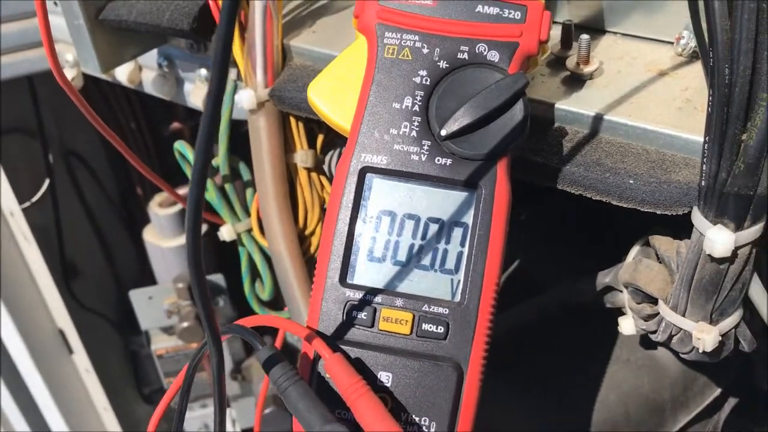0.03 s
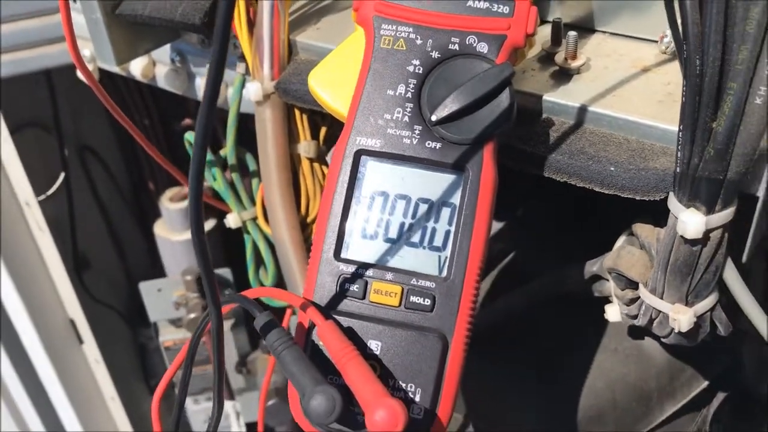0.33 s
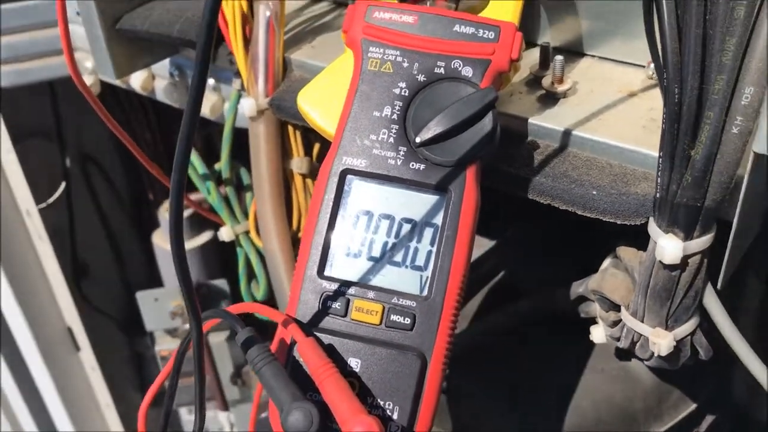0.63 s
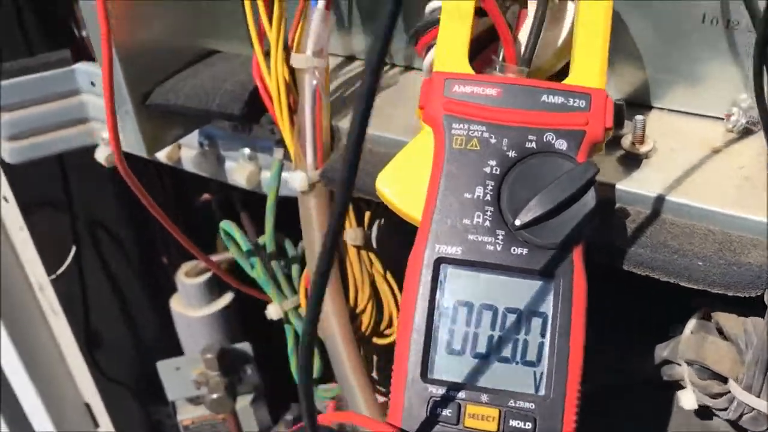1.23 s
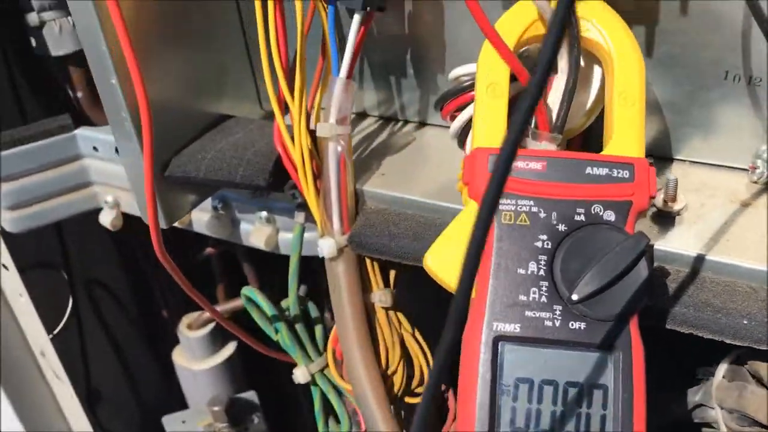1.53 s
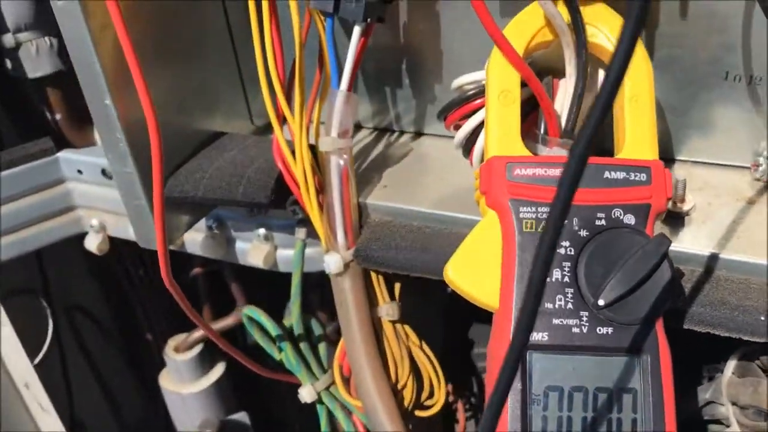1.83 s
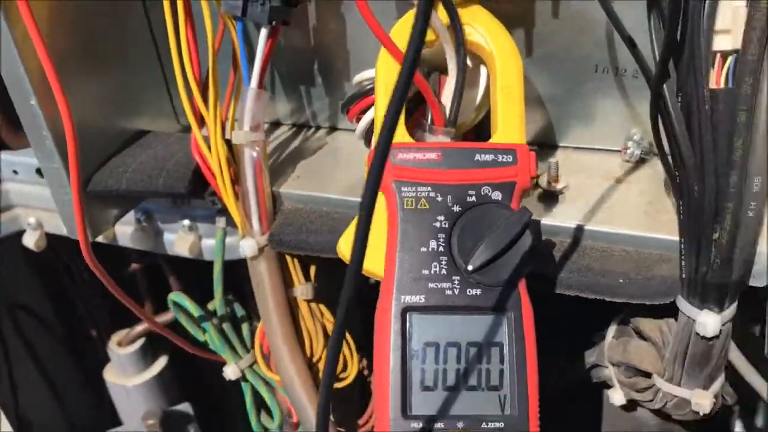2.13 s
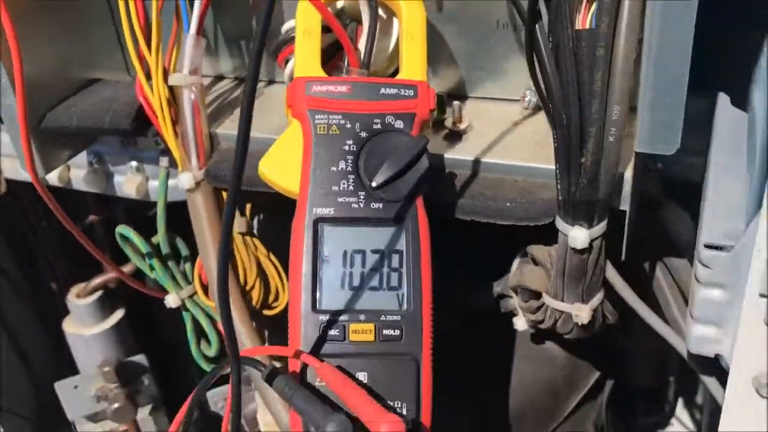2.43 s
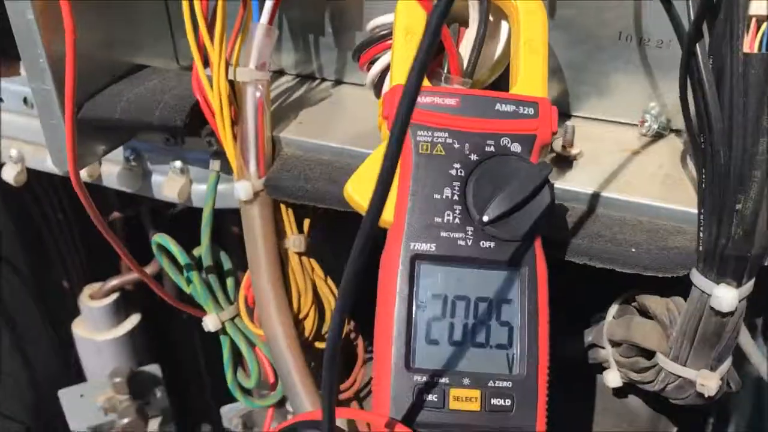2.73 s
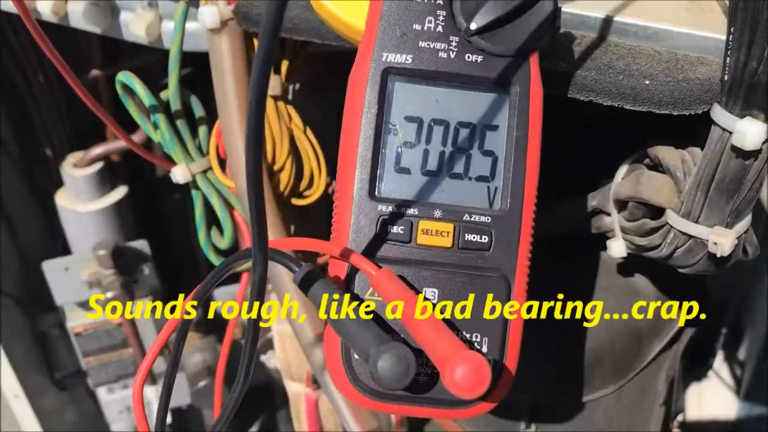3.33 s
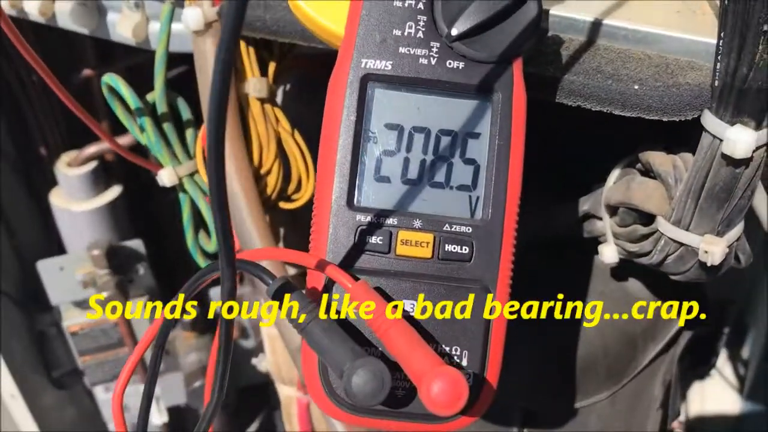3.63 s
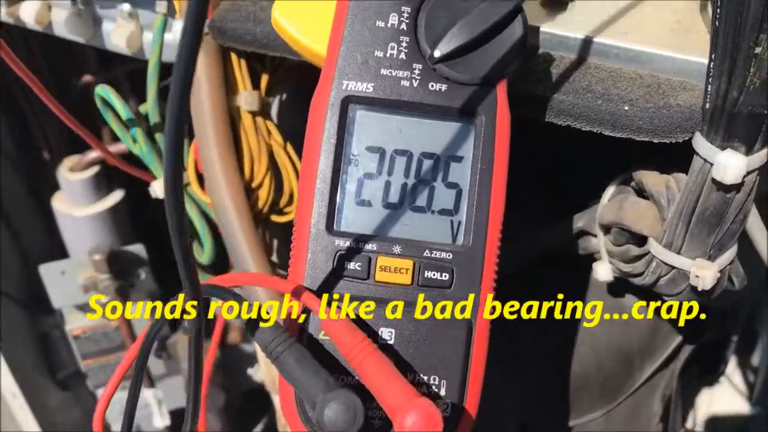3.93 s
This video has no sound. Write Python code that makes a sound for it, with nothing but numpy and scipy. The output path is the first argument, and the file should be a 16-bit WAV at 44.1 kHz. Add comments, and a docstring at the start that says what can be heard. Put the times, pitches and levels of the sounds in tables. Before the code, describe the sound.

An air conditioner compressor starts up roughly, close to the microphone outdoors. First a fan rumbles with a thin whine while test leads scrape and tick; then a relay clacks, and the compressor groans into a humming, squealing rattle.

```python
"""A fan rumbles and something electrical whines thinly: an outdoor air conditioner, panel off, close to
one microphone. Test leads scrape and tick. The contactor clacks shut and shakes the sheet-metal
cabinet, then the compressor starts with a groan and runs: a hum on the shaft's orders, a rough rattle
of knocks in every turn, a squealing shell and a pulsing hiss of gas."""
import sys
import numpy as np
from scipy import signal
from scipy.fft import rfft, irfft, next_fast_len
from scipy.io import wavfile
from scipy.ndimage import uniform_filter1d, map_coordinates

SR = 44100
rng = np.random.default_rng(int(sys.argv[2]) if len(sys.argv) > 2 else 0)


def bounce(signal):
    """Save signal as a 16-bit WAV file at the path given by the first command-line argument."""
    frames = np.transpose(np.atleast_2d(signal))
    limited = np.clip(frames, -1, 1)
    pcm = np.round(limited * 32767).astype(np.int16)
    wavfile.write(sys.argv[1], SR, pcm)


N = 176400

# fan rumble spectrum: freq_hz, gain_db
RUMBLE_COLOUR = [(30, -22), (48, -6), (62, -6.5), (115, -2), (150, 6), (190, -6.5), (260, -7), (390, -5.5),
                 (480, -17.5), (800, -29), (2000, -48)]
# rushing air spectrum: freq_hz, gain_db
RUSH_COLOUR = [(300, -32), (600, 3), (820, 0.5), (1300, 1), (2200, -7.5), (4300, -18), (6000, -18),
               (10400, -29), (11900, -19), (13300, -36), (15500, -27)]
# rushing air over time: time_s, gain_db
RUSH_LEVEL = [(0, -56), (.6, -56.5), (1.0, -55.5), (1.45, -56), (1.85, -55.5), (2.15, -55)]
# low fan tones: pitch_hz, gain_db, flutter_db, wander_rad
FAN_TONES = [(76.6, -36.5, 0, 0.21), (101.1, -63, -10.5, 2.7), (155.1, -43, 1, 1.35), (205.8, -45, 0, 0.52),
             (233, -46, -2.5, 0.65)]
# electrical tones: pitch_hz, gain_db
WHINE_TONES = [(11666, -15), (11739, -3), (11844, -8), (11948, 0), (12035, -15)]
# whine over time: time_s, level_db
WHINE_LEVEL = [(0, -57), (.5, -53.5), (1.0, -51.5), (1.62, -60), (1.75, -55.5), (2.22, -60), (2.47, -53.5),
               (2.8, -54)]
# scrapes of the leads: peak_s, level_db, rise_s (per 20 dB), t60_s
SCRAPES = [(1.128, -33.5, 0.017, 0.097), (1.190, -46.5, 0.0046, 0.063), (1.207, -50, 0.0044, 0.025),
           (1.268, -49.5, 0.088, 0.18)]
# scrape and click spectrum: freq_hz, gain_db
SCRAPE_COLOUR = [(500, 0), (1800, -9.5), (2500, -1), (3800, 0), (4800, -4.5), (6000, -2.5), (10000, -15.5),
                 (15000, -14)]
# touches of a probe tip: start_s, gain_db
PROBE_TICKS = [(1.4715, -50), (1.567, -31.5)]
# the tip's ring: pitch_hz, gain_db, t60_s
PROBE_MODES = [(1030, -1, 0.025), (2930, 2, 0.02), (3230, -2, .016), (3720, -4.5, 0.031),
               (6000, -13, 0.018)]
# coil pulls, contacts touch, armature lands and rebounds: start_s, level_db, t60_s
CLACKS = [(2.1602, -28, 0.026), (2.1683, -27, 0.014), (2.1718, -12.5, 0.024), (2.174, -14.5, 0.028),
          (2.1782, -19, 0.038)]
# clack spectrum: freq_hz, gain_db
CLACK_COLOUR = [(410, -7), (700, -10), (1100, -6), (1270, 1), (1450, -11.5), (2310, -4), (2530, -17),
                (2990, -6), (3680, -17), (3970, -2), (4350, -10), (5290, -14), (6420, 0.5), (7400, -18),
                (8210, -4.5), (9110, -14), (15500, -12.5)]
# the cabinet's ring: pitch_hz, level_db, t60_s
CABINET_MODES = [(132, -38, 0.2), (198, -23, 0.22), (317, -22, 0.18), (352, -23, 0.17), (606, -20.5, 0.19),
                 (590, -18.5, 0.077), (780, -27.5, 0.073), (930, -23, 0.01), (1292, -29.5, 0.14)]
# shaken sheet metal spectrum: freq_hz, gain_db
PANEL_COLOUR = [(200, 11), (600, 5), (1200, -4), (2400, 1.5), (4000, -6), (15000, -23)]
# start-up groan over time: time_s, level_db
GROAN_LEVEL = [(2.2, -58), (2.3, -43), (2.41, -41), (2.52, -44), (2.62, -42), (2.8, -54), (4, -56)]
# groan spectrum: freq_hz, gain_db
GROAN_COLOUR = [(200, -25), (400, -12.5), (520, 12.5), (600, 0), (750, -5), (2000, -45)]
# bearing squeaks at start-up: start_s, length_s, pitch_hz, level_db
SQUEAKS = [(2.25, 0.054, 7300, -50.5), (2.303, 0.03, 5900, -44.5)]
# compressor shaft speed: time_s, speed_hz
SHAFT_SPEED = [(3.24, 59.7), (3.382, 59.1), (3.424, 59.5), (3.644, 59.7)]
# running compressor: time_s, treble_gain_db (rattle and hiss), loud_order_gain_db
RUNNING_LEVELS = [(2.23, -52.5, -50.5), (2.48, -41, -35), (2.506, -43.5, -43), (2.756, -40.5, -36.5),
                  (2.92, -40, -49.5), (3.102, -39.5, -41), (3.372, -41, -38.5), (3.446, -41, -49.5),
                  (3.51, -41.5, -43), (3.974, -39.5, -40), (4.0, -41, -44)]
# hum on multiples of the shaft speed: order, level_db
HUM_ORDERS = [(1, -49), (3, -43.5), (4, -47.5), (5, -48.5), (6, -51.5), (7, -58), (9, -51), (10, -61.5),
              (12, -54), (13, -58), (16, -63), (21, -62), (24, -60)]
# tone near 900 Hz over time: time_s, level_db
WHISTLE_LEVEL = [(2.8, -78), (2.92, -52.5), (3.55, -52), (3.62, -73), (3.78, -49), (4, -61)]
# compressor shell resonances: centre_hz, half_width_hz, gain_db
SHELL_MODES = [(2062, 63, 2.5), (2379, 8, -0.5), (2480, 55, 1), (2860, 19, 0), (3850, 52, 1)]
# shell over time: time_s, then one gain_db for each resonance
SHELL_LEVELS = [(2.3, -63, -65, -58, -75, -69), (2.374, -87, -57, -57, -76, -50.5),
                (2.49, -60, -43, -55, -54.5, -65), (2.772, -51.5, -39.5, -46.5, -53, -53),
                (3.028, -49, -46.5, -46.5, -54, -56), (3.153, -52, -54, -55, -47, -70),
                (3.26, -52, -45.5, -57, -52, -45), (3.34, -59, -45, -49.5, -58, -56),
                (3.588, -59, -55, -57, -46.5, -55), (3.777, -50, -50.5, -55.5, -56, -56),
                (4.0, -57, -40.5, -56, -51, -56)]
# rattle spectrum: freq_hz, gain_db
RATTLE_COLOUR = [(300, -14), (750, 0), (1300, -5.5), (1700, -8), (2400, 3.5), (2650, -5.5), (3400, 1),
                 (3780, -0.5), (4300, -1), (4550, 1.5), (4850, -5.5), (5150, -0.5), (5400, -4.5),
                 (5850, 3.5), (7400, -10), (8400, -5.5), (10300, -9.5), (11700, -6.5), (12500, -14),
                 (14600, -1), (15600, -9.5)]
# gas hiss and rasp spectrum: freq_hz, gain_db
HISS_COLOUR = [(300, -21), (550, -3), (800, -1.5), (1400, -0.5), (1750, -5), (2400, 4), (3200, 3),
               (4900, 0.5), (5800, 2), (7400, -2), (8500, 2), (10300, -15), (11700, -3), (14600, -7),
               (15700, -30.5)]

THUMP_S, START_S, CATCH_S = 2.1785, 2.19, 2.385  # cabinet is struck, motor starts, pump takes its load
LOUD_ORDER, WHISTLE_ORDER = 8, 15
HUM_RISE_S = 0.4
LOW_CUT_HZ, TOP_HZ = 35, 15850


def amp(db):
    """Decibels to gain."""
    return 10 ** (np.asarray(db) / 20)


def unit(x):
    """Scale to rms 1."""
    return x / np.sqrt(np.mean(x ** 2) + 1e-20)


def clock():
    """Time of each sample in seconds."""
    return np.arange(N) / SR


def curves(rows):
    """One value per sample for each column after the time."""
    times, *columns = np.transpose(rows)
    return [np.interp(clock(), times, column) for column in columns]


def wobble(rate):
    """A smooth random curve, rate knots a second."""
    return map_coordinates(rng.standard_normal(512), [clock() * rate], mode="wrap")


def filtered(x, response):
    """x through a gain that depends on frequency."""
    size = next_fast_len(N + SR // 2)
    return irfft(rfft(x, size) * response(np.fft.rfftfreq(size, 1 / SR)), size)[:N]


def coloured(x, colour):
    """x shaped by (freq_hz, gain_db) points, at rms 1."""
    freqs, db = np.transpose(colour)
    return unit(filtered(x, lambda hz: amp(np.interp(np.log(hz + 1), np.log(freqs + 1), db))))


def noise(colour):
    """Coloured noise of rms 1."""
    return coloured(rng.standard_normal(N), colour)


def struck(start_s, t60, attack_s):
    """Envelope of a blow: a fast rise, then a fall of 60 dB in t60 seconds."""
    age = np.maximum(clock() - start_s, 0)
    return amp(-60 * age / t60) * (1 - np.exp(-age / attack_s))


def patchy(x, depth_db):
    """Narrow bands of x flare and fade on their own."""
    bands = signal.stft(x, nperseg=512)[2]
    flare = rng.standard_normal(bands.shape)
    for _ in range(2):
        flare = uniform_filter1d(uniform_filter1d(flare, size=3, axis=0), size=24, axis=1)
    return unit(signal.istft(bands * amp(depth_db * unit(flare)), nperseg=512)[1][:N])


def order_tone(turns, order, wander_rad):
    """A tone of rms 1 on a multiple of the shaft speed."""
    return np.sqrt(2) * np.sin(2 * np.pi * order * turns + wander_rad * wobble(6.99))


def fan():
    """The bed of the scene: rumble and rushing air, with a few unsteady low tones."""
    out = amp(-37.5 + 1.43 * wobble(11)) * noise(RUMBLE_COLOUR)
    out += amp(curves(RUSH_LEVEL)[0] + 5.5) * noise(RUSH_COLOUR)
    for hz, db, flutter_db, wander_rad in FAN_TONES:
        level = amp(db + flutter_db * wobble(21.96) - 1.5)
        out += level * np.sqrt(2) * np.sin(2 * np.pi * hz * clock() + wander_rad * wobble(14))
    return out


def whine():
    """A cluster of very high electrical tones that waver together."""
    level_db, = curves(WHINE_LEVEL)
    waver_rad = .6 * wobble(35)
    flutter_db = 1.2 * wobble(18)
    tones = np.zeros(N)
    for hz, db in WHINE_TONES:
        gain = amp(db + 1.8 * wobble(12))
        tones += gain * np.sin(2 * np.pi * hz * clock() + waver_rad + 0.4 * wobble(7))
    return amp(level_db + flutter_db) * unit(tones)


def leads():
    """The meter's leads scrape as they are moved; a probe tip touches with a dry click and rings."""
    t = clock()
    scrapes = sum(amp(db - 20 * np.maximum(s - t, 0) / rise_s - 60 * np.maximum(t - s, 0) / t60)
                  for s, db, rise_s, t60 in SCRAPES)
    grain = amp(3.4 * wobble(450))
    clinks = sum(amp(db + mode_db) * struck(s, t60, attack_s=0.00073) * np.sin(2 * np.pi * hz * (t - s))
                 for s, db in PROBE_TICKS for hz, mode_db, t60 in PROBE_MODES)
    clicks = sum(amp(db - 6.5) * struck(s, t60=0.0087, attack_s=.0003) for s, db in PROBE_TICKS)
    return (scrapes * grain + clicks) * noise(SCRAPE_COLOUR) + clinks


def contactor():
    """A quick run of hard contacts; the last one sets the cabinet ringing and its panels shaking."""
    blows = sum(amp(db) * struck(s, t60, attack_s=0.0003) for s, db, t60 in CLACKS)
    out = blows * noise(CLACK_COLOUR)
    for hz, db, t60 in CABINET_MODES:
        ring = np.sin(2 * np.pi * hz * (clock() - THUMP_S) + 0.43 * wobble(60))
        out += amp(db) * struck(THUMP_S, t60, attack_s=0.00042) * ring
    panels = amp(-24.5) * struck(THUMP_S, t60=0.29, attack_s=0.0016) * noise(PANEL_COLOUR)
    return out + panels


def start_up():
    """The motor groans, its bearings squeak, and the pump rasps briefly as it takes up its load."""
    t = clock()
    out = amp(curves(GROAN_LEVEL)[0]) * noise(GROAN_COLOUR)
    for start_s, length_s, hz, db in SQUEAKS:
        progress = np.clip((t - start_s) / length_s, 0, 1)
        arch = np.sqrt(np.abs(np.sin(np.pi * progress)))
        out += amp(db) * arch * np.sin(2 * np.pi * hz * t + 0.97 * wobble(130))
    rasp = amp(-40) * struck(CATCH_S, t60=0.31, attack_s=0.0016) * noise(HISS_COLOUR)
    return out + rasp


def hum(turns, loud_db):
    """Tones on the shaft's orders swell in; a whistle and one loud order come and go on their own."""
    out = np.zeros(N)
    for order, db in HUM_ORDERS:
        level = amp(db + 2.64 * wobble(4.034))
        out += level * order_tone(turns + rng.random(), round(order), wander_rad=0.17)
    out *= 1 - np.exp(-np.maximum(clock() - START_S, 0) / HUM_RISE_S)
    out += amp(curves(WHISTLE_LEVEL)[0]) * order_tone(turns, WHISTLE_ORDER, wander_rad=0.12)
    return out + amp(loud_db - 1.5) * order_tone(turns, LOUD_ORDER, wander_rad=0.067)


def shell(turns):
    """The shell squeals on the nearest shaft orders: narrow resonances as single fluttering tones,
    wide ones pulsing once a turn."""
    out = np.zeros(N)
    speed_hz = turns[-1] * SR / N
    for (hz, half_width_hz, db), level_db in zip(SHELL_MODES, curves(SHELL_LEVELS)):
        orders = round(hz / speed_hz) + np.arange(-2, 3)
        weights = np.exp(-((orders * speed_hz - hz) / half_width_hz) ** 2)
        shifted = turns - 0.12 + 0.08 * rng.standard_normal()
        ring = sum(w * order_tone(shifted, k, wander_rad=.42) for k, w in zip(orders, weights))
        out += amp(level_db + db - 0.7 + 3.1 * wobble(40)) * unit(ring)
    return out


def stroke(turns, swing_db=2.6):
    """Gain from the pump's load, which jumps once in a turn and then eases off."""
    return amp(swing_db * (np.sin(2 * np.pi * turns) + .5 * np.sin(4 * np.pi * turns)))


def knocks(turns, angle, jitter_s=.000014):
    """One impulse each time the shaft passes an angle (in turns), a little early or late."""
    at = np.interp(np.arange(1, int(turns[-1]) + 1), turns - angle, np.arange(N))
    at += jitter_s * SR * rng.standard_normal(512)[:len(at)]
    taps = at.astype(int)[:, None] + np.arange(-7, 9)
    offset = taps - at[:, None]
    pulse = np.sinc(offset) * np.cos(np.pi * offset / 16) ** 2  # lets a knock fall between samples
    return np.bincount(np.clip(taps, 0, N).ravel(), pulse.ravel(), N + 1)[:N]


def rattle(turns, ring_t60, knocks_per_turn):
    """Metallic knocks recur at the same angles each turn, each with its own short ring: a dense buzz."""
    out, age = np.zeros(N), np.arange(1024) / SR
    for k in range(knocks_per_turn):
        angle = (k + rng.random()) / knocks_per_turn + .0006 * wobble(4)
        hits = knocks(turns, angle) * amp(2.5 * wobble(5))
        ring = rng.standard_normal(len(age)) * amp(-60 * age / ring_t60)
        out += signal.fftconvolve(hits, ring)[:N]
    return patchy(coloured(out * stroke(turns), RATTLE_COLOUR), depth_db=2.8)


def gas_hiss(turns):
    """Gas hisses in pulses, one to each stroke of the pump."""
    return unit(stroke(turns) * noise(HISS_COLOUR))


def compressor():
    """The main source: one shaft drives hum, shell resonances, rattle and gas hiss."""
    t = clock()
    speed_hz, = curves(SHAFT_SPEED)
    turns = np.cumsum(speed_hz) / SR
    treble_db, loud_db = curves(RUNNING_LEVELS)
    # rattle and hiss get a slight rising lift until the pump catches
    treble_db += 0.5 * np.clip((t - START_S) / (CATCH_S - START_S), 0, 1) * (t < CATCH_S)
    out = hum(turns, loud_db) + shell(turns) + start_up()
    out += amp(treble_db - 0.3) * rattle(turns, ring_t60=0.016, knocks_per_turn=12)
    out += amp(treble_db - 4.5) * gas_hiss(turns)
    switched_on = np.clip((t - START_S) / 0.015, 0, 1)
    return out * switched_on


def scene():
    """Outdoors at the open cabinet, everything close to one microphone."""
    return (fan() + whine() + leads() + contactor() + compressor())[None]


def record(dry):
    """The microphone drops the deepest bass and the very top of the treble."""
    band = lambda hz: (1 - np.exp(-(hz / LOW_CUT_HZ) ** 4)) * np.exp(-(hz / TOP_HZ) ** 120)
    return filtered(dry[0], band)[None]


dry = scene()
out = record(dry)
bounce(out)
```